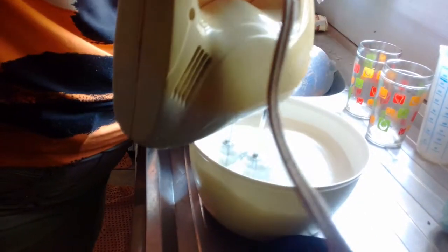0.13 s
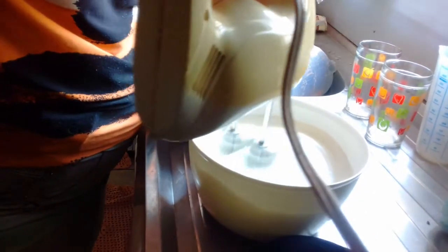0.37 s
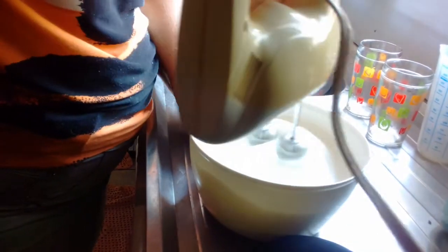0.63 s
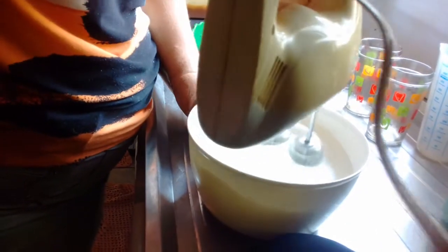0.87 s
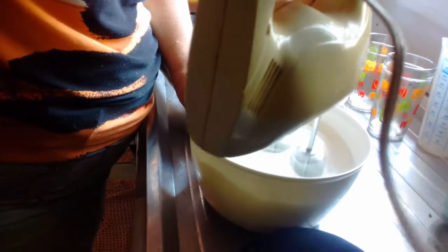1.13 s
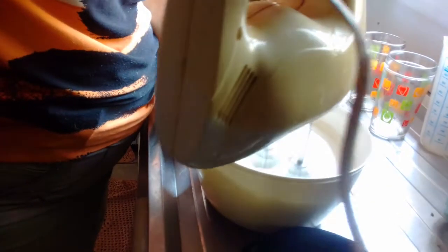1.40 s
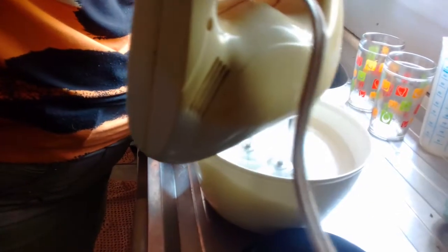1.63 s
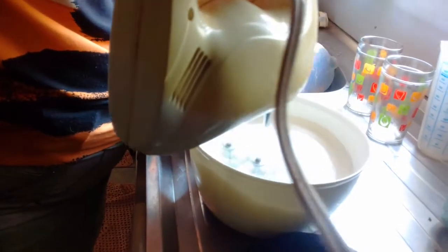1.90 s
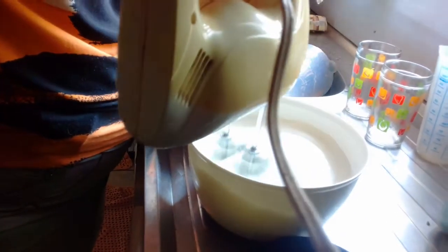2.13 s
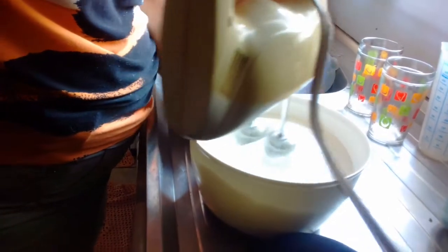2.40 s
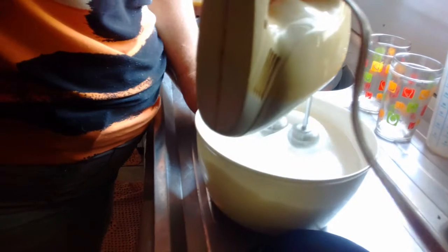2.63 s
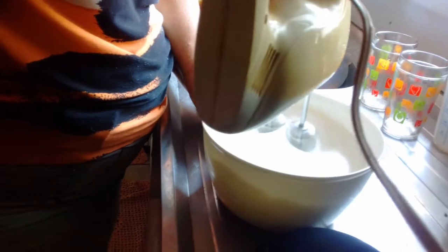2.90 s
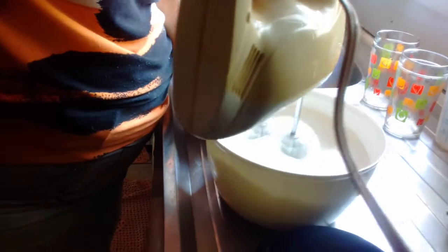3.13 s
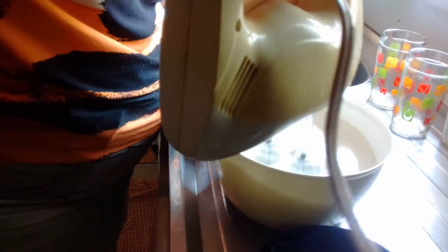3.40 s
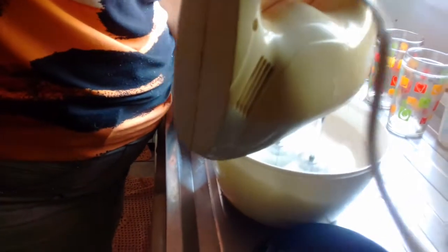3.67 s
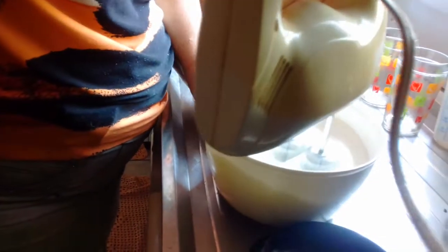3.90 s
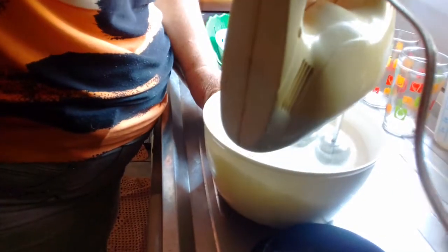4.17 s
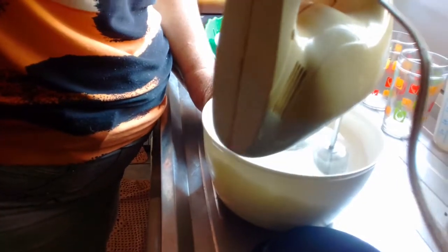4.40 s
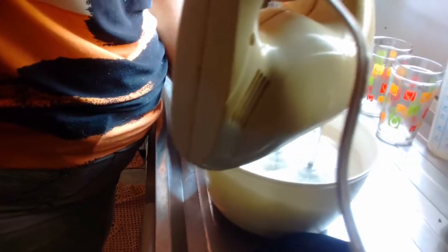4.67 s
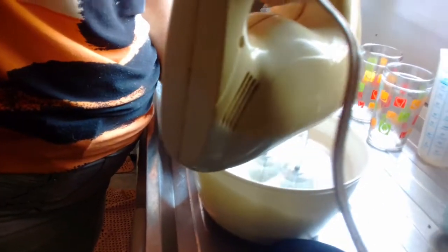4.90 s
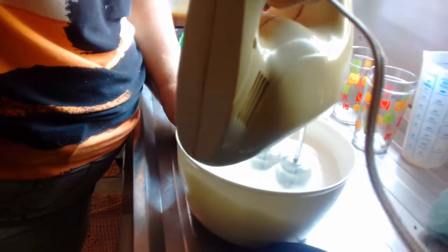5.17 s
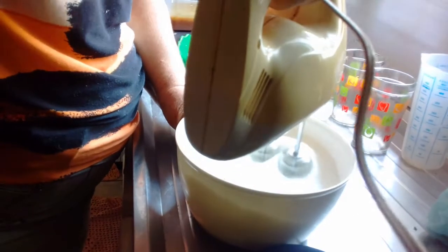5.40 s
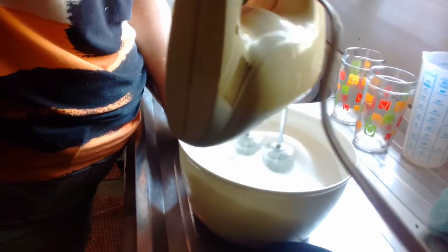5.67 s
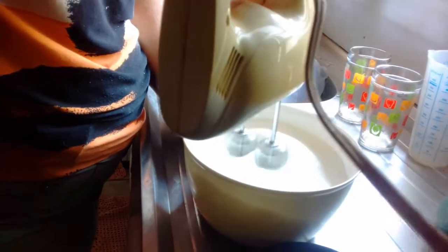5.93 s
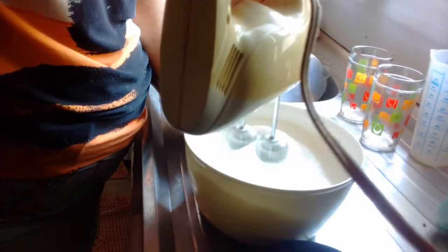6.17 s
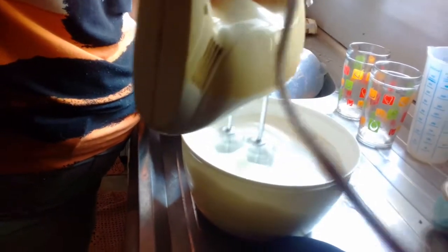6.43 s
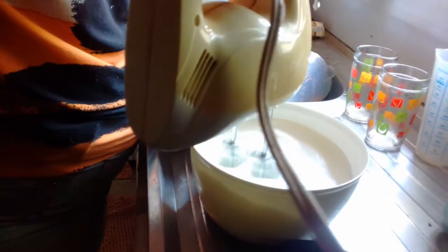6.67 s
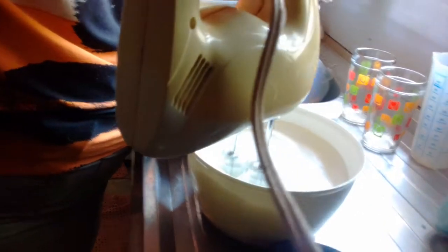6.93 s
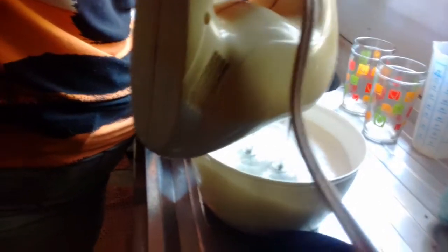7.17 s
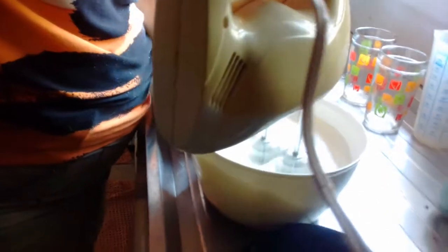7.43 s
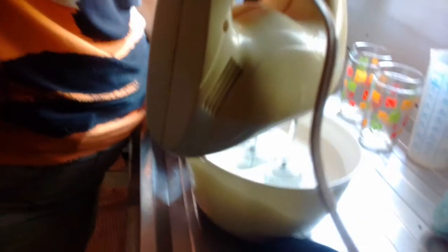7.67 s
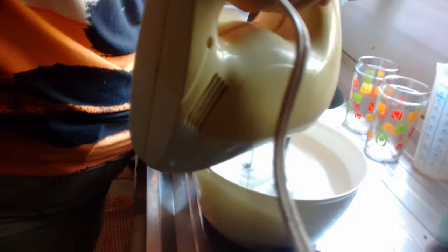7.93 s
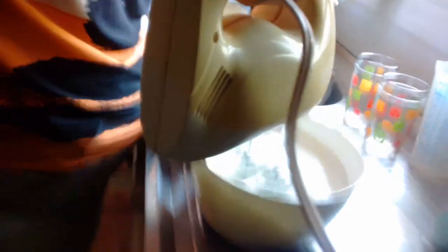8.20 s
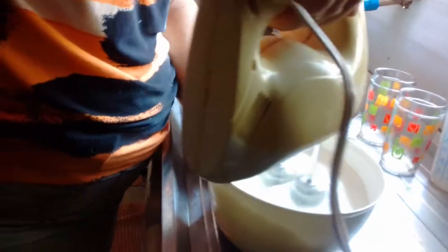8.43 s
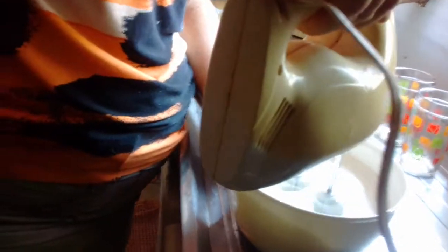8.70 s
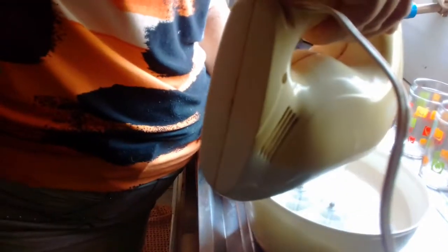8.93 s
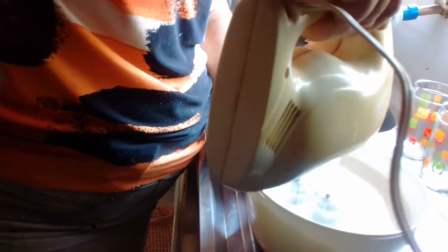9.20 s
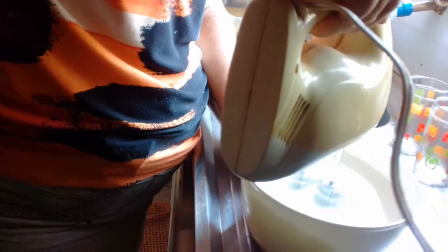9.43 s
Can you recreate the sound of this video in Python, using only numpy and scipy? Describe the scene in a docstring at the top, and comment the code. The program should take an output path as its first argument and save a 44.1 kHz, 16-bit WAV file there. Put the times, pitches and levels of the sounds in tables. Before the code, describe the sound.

A hand mixer runs without pause very close to the microphone in a home kitchen: bright airy hiss, gritty gear whirr and high steady motor whine. Beneath it beaters churn wet foam with a fast flutter and a low bowl rumble that swells and fades. Short bursts of beater rattle hit the plastic bowl near two, almost three and six seconds; past eight seconds the microphone is bumped and the mixer dulls slightly.

```python
"""A hand mixer whips egg whites in a plastic bowl, heard from close by through one microphone.
Vent air is noise in flickering bands, gear whirr is noise through housing resonances, and motor tones
are sines at multiples of shaft speed. The beaters churn the foam (pulsed splashes and noise), rumble in
the bowl and now and then rap its wall (ringing modes); late on, the microphone is bumped."""
import sys
import numpy as np
from scipy import signal
from scipy.fft import rfft, irfft
from scipy.io import wavfile
from scipy.ndimage import uniform_filter1d, minimum_filter1d

SR = 44100
rng = np.random.default_rng(int(sys.argv[2]) if len(sys.argv) > 2 else 0)


def digitize_waveform(pressure):
    """Quantize a signal to 16-bit integers and store it at the path in sys.argv[1].

    Rows of a 2-D input are taken as channels; values are limited to [-1, 1].
    """
    field = np.atleast_2d(pressure).T
    bounded = np.clip(field, -1, 1)
    quanta = np.round(bounded * 32767).astype(np.int16)
    wavfile.write(sys.argv[1], SR, quanta)


def field_ratio(decibels):
    """Amplitude ratio for a level in dB (20 dB per decade); scalars and array-likes work."""
    return 10 ** (np.asarray(decibels, dtype=float) / 20)


N = 422028
GEAR_RATIO = 21.5   # shaft turns per beater turn

# Motor speed, sagging under load. Each row: time in seconds, shaft turns per second.
SHAFT_SPEED = [(0.0, 410.65), (0.75, 409.7), (1.25, 409.2), (1.85, 410.65), (2.25, 410.0), (2.5, 410.2),
               (2.9, 409.0), (3.5, 409.65), (4.45, 409.35), (5.1, 410.85), (6.6, 410.6), (7.0, 411.35),
               (7.75, 410.6), (8.1, 411.35), (8.7, 409.8), (9.25, 410.45), (9.57, 410.16)]
# Modes of the plastic bowl. Each row: frequency in Hz, relative level in dB, t60 in seconds.
BOWL_MODES = [(162, -8, 0.082), (221, -18, 0.068), (319, -14.5, 0.086), (407, -9, 0.033),
              (541, -13.5, 0.11), (603, -8, 0.035), (794, 3.5, 0.0042), (900, -47, 0.12),
              (990, -30.5, 0.014), (1220, -5, 0.029), (2010, -8, 0.005)]


def rms_one(x):
    """Scale to rms 1."""
    return x / np.sqrt(np.mean(x ** 2) + 1e-20)


def in_time(rows):
    """Columns of a curve table, one value a sample."""
    s, *columns = np.transpose(rows)
    return [np.interp(np.arange(N) / SR, s, c) for c in columns]


def drift(rate_hz):
    """Slow chance of spread 1: coarse noise through a double one-pole low-pass."""
    hop = 40   # samples per coarse step
    r = np.exp(-2 * np.pi * rate_hz * hop / SR)
    coarse = rng.standard_normal(N // hop + 2002)
    slow = signal.lfilter([1], [1, -2 * r, r * r], coarse)[2000:]   # settled part
    return np.interp(np.arange(N) / hop, np.arange(len(slow)), rms_one(slow))


def poles(hz, r):
    """Denominator of a two-pole resonator of pole radius r."""
    return [1, -2 * r * np.cos(2 * np.pi * hz / SR), r * r]


def ring(clicks, hz, t60_s):
    """A unit click sets a decaying sine of starting height 1 ringing."""
    r = field_ratio(-60 / (max(t60_s, .002) * SR))
    return signal.lfilter([0, np.sin(2 * np.pi * hz / SR)], poles(hz, r), clicks + 1e-18)


def coloured(source, spectrum, slow_db, fast_db, count):
    """The source shaped to the spectrum and cut into overlapping bands that each swell and flicker."""
    hz, level_db = np.transpose(spectrum)
    log_hz = np.log(np.arange(1, N // 2 + 2) * SR / N)
    shaped = rfft(source) * field_ratio(np.interp(log_hz, np.log(hz), level_db, left=-90, right=-90))
    place = (log_hz - np.log(hz[0])) / np.log(hz[-1] / hz[0]) * (count - 1)
    out, together = 0, drift(10.0)
    for k in range(count):
        share = np.clip(1 - abs(place - k), 0, 1) ** .5
        band = irfft(shaped * share, N)
        flicker = 0.27 * together + drift(23)
        out = out + band * field_ratio(slow_db * drift(0.77) + fast_db * flicker)
    return rms_one(out)


def vent_air():
    """Air blown through the vents: broad hiss whose bands swell and flicker."""
    # Each row: frequency in Hz, relative density in dB per Hz.
    air_spectrum = [(3290, -12), (5600, -11), (5900, -8), (7220, -0.5), (8880, 1.5), (9970, -4),
                    (11500, -13), (12900, -17.5), (15000, -20.5), (15700, -18)]
    return coloured(rng.standard_normal(N), air_spectrum, slow_db=0.84, fast_db=0.83, count=14)


def gear_whirr():
    """Tooth and brush noise sounds through the housing; each resonance turns toward and away from the ear."""
    # Housing resonances. Each row: frequency in Hz, width in Hz, relative level in dB.
    housing_modes = [(2010, 140, -6.5), (2410, 134, -5), (2647, 190, -4), (3257, 300, -4.5), (3918, 69, -7),
                     (4448, 116, -3.5), (4925, 228, 1.5), (5303, 580, -5)]
    # Resonances near 2 to 2.7 kHz. Each row: time in seconds, level offset in dB.
    low_whirr = [(0, 1), (.8, -1), (1.5, -0.5), (2.5, 0), (3.5, 0), (4.5, -0.5), (5.3, 0.5), (5.8, -1.5),
                 (7, 0), (8.2, -1.5), (8.4, 4), (8.65, 2.5), (9.57, 3)]
    # Resonances near 4.4 to 5.3 kHz. Each row: time in seconds, level in dB, used about its mean.
    high_whirr = [(0.0, -31.5), (1.2, -27.5), (1.36, -29.5), (3.33, -30), (3.44, -30.5), (4.34, -29),
                  (4.8, -29.5), (5.41, -28.5), (5.57, -30.5), (7.43, -30.5), (8.18, -30), (8.21, -32),
                  (8.48, -27), (8.72, -29), (9.52, -28), (9.57, -29)]
    low_top_hz, high_foot_hz = 2900, 4200
    noise = rng.standard_normal(N) * field_ratio(0.62 * drift(42))
    (low_db,), (high_db,) = in_time(low_whirr), in_time(high_whirr)
    out = 0
    for k, (hz, width_hz, db) in enumerate(housing_modes):
        db = db + low_db * (hz < low_top_hz) + (high_db - high_db.mean()) * (hz > high_foot_hz)
        r = np.exp(-np.pi * width_hz / SR)
        peak = signal.lfilter([(1 - r * r) / 2, 0, (r * r - 1) / 2], poles(hz, r), noise)
        out = out + (-1) ** k * field_ratio(db + 0.8 * drift(0.99) + 0.26 * drift(13.0)) * peak
    band = signal.butter(2, [1700, 5700], "band", fs=SR, output="sos")
    return rms_one(signal.sosfilt(band, out))


def motor_tones(turns):
    """Unbalance hums at shaft speed; fan blades, rotor slots and commutator bars sing at multiples of it."""
    # Hum at shaft speed. Each row: time in seconds, level in dB.
    hum_curve = [(0, -46), (.3, -46.5), (.55, -52), (1.2, -50.5), (1.6, -45.5), (2.1, -46.5), (3, -58),
                 (3.5, -42), (4, -44), (4.25, -54.5), (5, -39), (5.3, -51), (6.25, -52), (6.9, -41.5),
                 (8.4, -41.5), (8.65, -47), (9, -43.5), (9.25, -47), (9.57, -43.5)]
    # Whines that fade against their own reflection. Each row: multiple of shaft speed, level in dB.
    whines = [(12, -36), (16, -32.5), (24, -32), (32, -49), (36, -54)]
    # Other motor tones, each wavering by chance. Each row: multiple of shaft speed, level in dB.
    wavering_tones = [(3, -54), (4, -47), (13, -47), (15, -51), (18, -43), (21, -47), (25, -52), (28, -58),
                      (37, -57)]
    # the reflection's path changes as the mixer moves
    reflected_share, path_swing_rad, path_rate_hz = 1, 2.36, 0.44
    whine_waver_rad = .55   # fast phase unrest that widens each whine
    shaft_rad = 2 * np.pi * turns
    out = field_ratio(in_time(hum_curve)[0] + 0.81 * drift(4)) * np.sin(shaft_rad + 0.16 * drift(41))
    for k, db in whines:
        path_rad = 2 * np.pi * rng.random() + path_swing_rad * drift(path_rate_hz)
        fading = abs(1 + reflected_share * np.exp(1j * path_rad))
        tone = np.sin(k * shaft_rad + whine_waver_rad * drift(30))
        out = out + field_ratio(db) * rms_one(fading) * tone
    for k, db in wavering_tones:
        out = out + field_ratio(db + 1.6 * drift(0.88)) * np.sin(k * shaft_rad + 1.3 * drift(50))
    return np.sqrt(2) * out   # peak to rms levels


def churning(turns):
    """Dense splashes in the foam, pulsing with each beater turn and wire; they also set the bowl humming."""
    # Each row: frequency in Hz, relative density in dB per Hz.
    churn_spectrum = [(160, -50), (270, -30.5), (313, -13), (374, -7), (406, -15.5), (448, -14),
                      (523, -5.5), (861, -2.5), (1640, -2), (1900, -6.5), (2470, -47), (4180, -120)]
    beater_rad = 2 * np.pi * turns / GEAR_RATIO
    throb = field_ratio(np.sin(beater_rad) + np.sin(4 * beater_rad))
    sizes = field_ratio(4.2 * np.minimum(rng.exponential(1, N), 5)) * rng.choice([-1, 1], N)
    splashes = rms_one(sizes * (rng.random(N) < 900 / SR))   # 900 per second
    source = throb * (0.3 * splashes + rng.standard_normal(N))
    bowl_hum = 0
    for k, (hz, db, t60_s) in enumerate(BOWL_MODES[2:]):
        bowl_hum = bowl_hum + (-1) ** k * field_ratio(db) * ring(source, hz, t60_s)
    foam = coloured(source, churn_spectrum, slow_db=1.5, fast_db=-0.5, count=9)
    return rms_one(foam + field_ratio(-13) * rms_one(bowl_hum))


def wire_passes():
    """Each passing wire may strike: time, peak dB and tick dB of the raps in each run along the wall."""
    # Runs along the wall. Each row: start in seconds, length in seconds, peak level in dB,
    # wire tick over the thud in dB, dB lost per step of wire shortfall.
    contacts = [(2.015, 0.18, -25, -5, 6), (2.667, .2, -20.5, 3.5, 1), (4.172, .35, -26, -8, 19),
                (6.12, .18, -23.5, 5, 1)]
    # Each entry: steps by which one of the four wires falls short of the longest.
    wire_shortfall = [0, 2, 1, 1.5]
    rap_spread_db, tick_spread_db, swell_db, jitter_s = 2.0, 2.0, 2.0, .002
    start_s, length_s, peak_db, tick_db, short_db = np.transpose(contacts)[:, :, None]
    wire = np.arange(32)
    mean_speed = np.mean(SHAFT_SPEED, axis=0)[1]
    after_s = wire * GEAR_RATIO / len(wire_shortfall) / mean_speed
    luck = rng.standard_normal((3, len(contacts), len(wire)))
    peak_db = peak_db - short_db * np.resize(wire_shortfall, len(wire))
    peak_db = peak_db + swell_db * np.sin(np.pi * after_s / length_s) + rap_spread_db * luck[0]
    tick_db = tick_db + tick_spread_db * luck[2]
    touching = after_s <= length_s
    s = start_s + after_s + jitter_s * luck[1] * (wire > 0)
    return s[touching], peak_db[touching], tick_db[touching]


def raps():
    """The wire ticks and chatters along the wall, which thuds a moment later; each mode has its own strength."""
    # Wire modes. Each row: frequency in Hz, relative level in dB, t60 in seconds.
    wire_modes = [(2400, -6, .014), (2800, -6, .012), (3200, -4, .016)]
    # Hard raps near or within the runs. Each row: time in seconds, peak level in dB,
    # wire tick over the thud in dB.
    hard_raps = [(1.989, -14.5, -2), (2.042, -15.5, -4), (2.093, -19, -5), (2.13, -14, -2),
                 (2.168, -17, -2), (2.182, -18, -10), (2.654, -15, 5), (2.682, -19, 3), (2.704, -16, 6),
                 (2.719, -21, 0), (2.744, -19, 9.5), (2.76, -15.5, 4), (2.774, -24, -3), (2.811, -20, 5),
                 (2.851, -24, 12), (6.107, -20, 0), (6.16, -17, 2), (6.185, -15, 1), (6.216, -20, 4),
                 (6.279, -22, 4)]
    s, peak_db, tick_db = np.hstack([wire_passes(), np.transpose(hard_raps)])
    at, out = np.round(s * SR).astype(int), np.zeros(N)
    luck = rng.standard_normal((len(at), len(BOWL_MODES) + len(wire_modes)))
    chatter = (rng.random(N) < 500 / SR) * rng.standard_normal(N)
    fade = np.exp(-1 / (.008 * SR))   # 8 ms
    for k, (hz, db, t60_s) in enumerate(BOWL_MODES + wire_modes):
        is_wire = k >= len(BOWL_MODES)
        delay = 20 if is_wire else 50   # samples
        clicks = np.zeros(N)
        clicks[at + delay] = field_ratio(peak_db + is_wire * tick_db + db + 1.5 * luck[:, k])
        clicks += .22 * chatter * signal.lfilter([0, 1], [1, -fade], clicks + 1e-18)
        out += ring(clicks, hz, t60_s)
    # a small bowl radiates little bass
    return signal.lfilter(*signal.butter(1, 420, "high", fs=SR), out)


def bowl_rumble():
    """Low noise in the bowl, before the level set by how deep the beaters dig."""
    # Each row: frequency in Hz, relative density in dB per Hz.
    rumble_spectrum = [(60, -34), (105, -6), (135, -10.5), (155, 1.5), (180, -9.5), (240, -14), (290, -36),
                       (400, -38)]
    return coloured(rng.standard_normal(N), rumble_spectrum, slow_db=1.1, fast_db=1.2, count=4)


def near_echoes(x):
    """Echoes whose paths stretch and shrink slowly draw wandering ripples through the noise."""
    # Near surfaces (counter, bowl, body, wall). Each row: echo delay in ms,
    # sway in ms as the mixer moves, level in dB.
    surfaces = [(.9, 0.047, -19), (1.7, 0.14, -11.5), (3.1, 0.162, -35.5), (5.3, 0.202, -17),
                (8.9, 0.285, -18.5), (14.3, 0.29, -15)]
    out, now = x.copy(), np.arange(N)
    for delay_ms, sway_ms, db in surfaces:
        lag = (delay_ms + sway_ms * drift(0.377)) * SR / 1000
        out += field_ratio(db) * np.interp(now - lag, now, x, left=0)
    return rms_one(out) * np.std(x)


def bumps():
    """Bumps on the microphone: a sharp pressure spike, then the membrane swings back once."""
    # Each row: spike time in seconds, signed height, rise in ms, swing back in ms, swing share of the height.
    mic_bumps = [(8.22417, -2.0, .021, .3, .1), (8.25622, 1.2, .085, .14, .42),
                 (8.2608, -.25, .08, .15, .6)]
    out, ms = np.zeros(N), np.arange(300) * 1000 / SR
    for s, height, rise_ms, back_ms, share in mic_bumps:
        spike = np.exp(-(ms / rise_ms - 2) ** 2 / 2)
        after = np.maximum(ms - 3 * rise_ms, 0) / back_ms
        at = round((s - 2 * rise_ms / 1000) * SR)
        out[at:at + len(ms)] += height * (spike - share * after * np.exp(1 - after))
    return out


def scene():
    """All sources reach one microphone, copied to both channels."""
    # How deep the beaters dig, heard as bowl rumble. Each row: time in seconds, level in dB.
    dig_curve = [(0, -47), (.32, -54), (.82, -41), (1.2, -41.5), (2.4, -51.5), (2.66, -41), (2.95, -45),
                 (3.3, -50.5), (3.8, -42), (4.13, -44), (4.25, -34), (4.65, -47), (5.25, -43.5), (5.9, -48),
                 (6.4, -49.5), (7.4, -47), (8.3, -50), (8.56, -42.5), (9.3, -49.5), (9.57, -45)]
    # The mixer's level, changing once the microphone is shifted. Each row: time in seconds,
    # level offset in dB, further offset in dB of gears and foam against the vent hiss.
    nearness = [(0, 0, -0.5), (8.185, 0, 0.5), (8.208, -4.5, 0), (8.235, 0.5, -4), (8.27, -2, -1),
                (8.31, -1, -0.5), (8.5, 0, -3), (8.56, -3.5, -0.5), (8.87, -2, -3), (9.33, -2.5, -2.5),
                (9.44, -1, -2), (9.57, 0, -3)]
    air_db, gear_db, churn_db = -17, -23.5, -28
    churn_follows = 0.12   # share of the rumble's swing in dB
    turns = np.cumsum(in_time(SHAFT_SPEED)[0]) / SR
    (dig_db,), (near_db, lows_db) = in_time(dig_curve), in_time(nearness)
    foam_db = churn_db + churn_follows * (dig_db - dig_db.mean())
    lows = field_ratio(gear_db) * gear_whirr() + field_ratio(foam_db) * churning(turns)
    noises = field_ratio(air_db) * vent_air() + field_ratio(lows_db) * lows
    mixer = field_ratio(near_db) * (near_echoes(noises) + motor_tones(turns))
    steady = mixer + field_ratio(dig_db) * bowl_rumble()
    return np.tile(steady + raps() + bumps(), (2, 1))


def top_cut(x):
    """Nothing passes above the cut-off."""
    return signal.sosfilt(signal.butter(12, 15820, fs=SR, output="sos"), x)


def record(dry):
    """The microphone cuts the bass and adds a faint low noise; a limiter looks ahead and fades around high peaks."""
    mic_cut_hz, low_noise_db = 179, -71
    limit, look_ahead_s = .93, .015
    dry = signal.sosfilt(signal.butter(4, mic_cut_hz, "high", fs=SR, output="sos"), dry)
    low_band = signal.butter(1, [45, 110], "band", fs=SR, output="sos")
    low_noise = signal.sosfilt(low_band, rng.standard_normal(N))
    dry = dry + field_ratio(low_noise_db) * rms_one(low_noise)
    span = round(look_ahead_s * SR)
    needed = np.minimum(1, limit / (abs(dry[0]) + 1e-9))
    gain = uniform_filter1d(minimum_filter1d(needed, size=span), size=span)
    return top_cut(dry * gain)


dry = scene()
out = record(dry)
digitize_waveform(out)
```